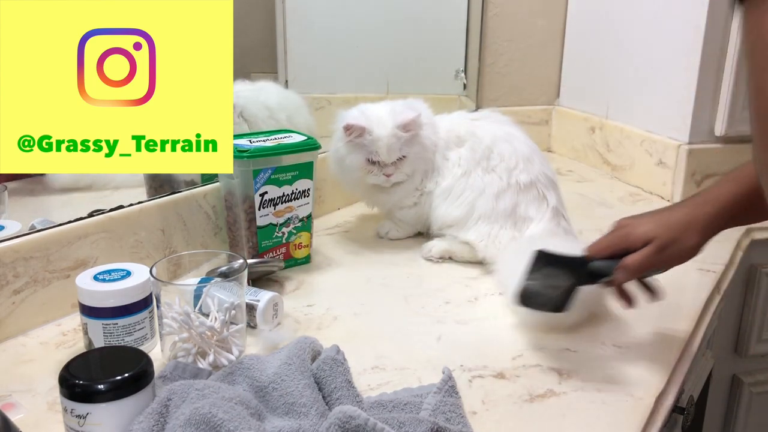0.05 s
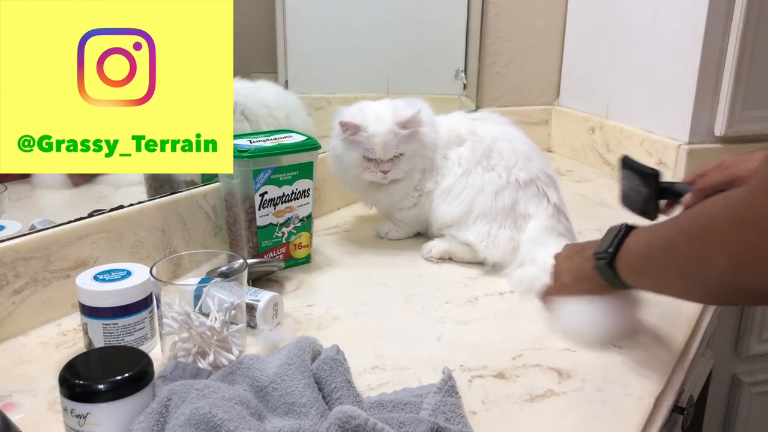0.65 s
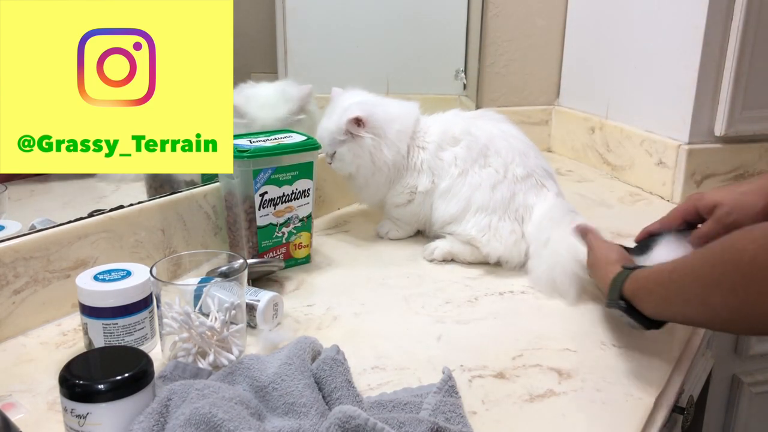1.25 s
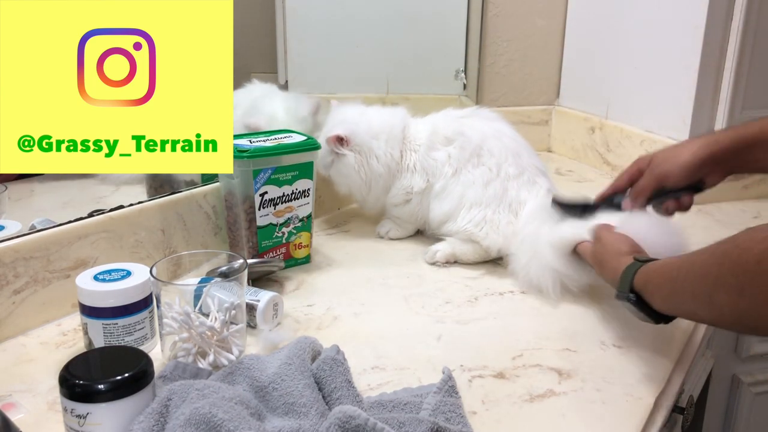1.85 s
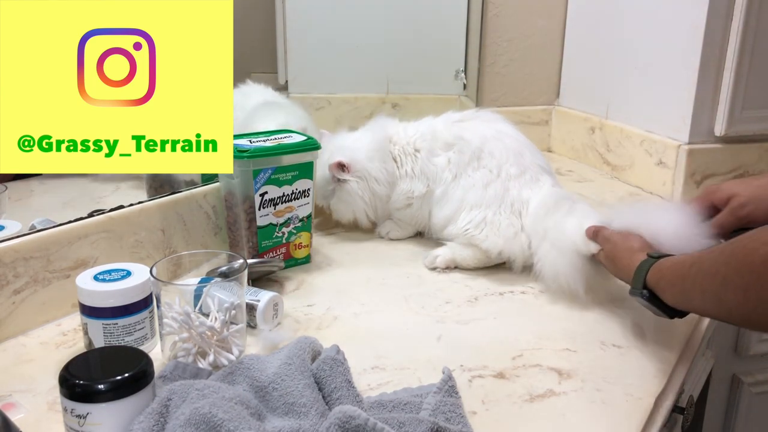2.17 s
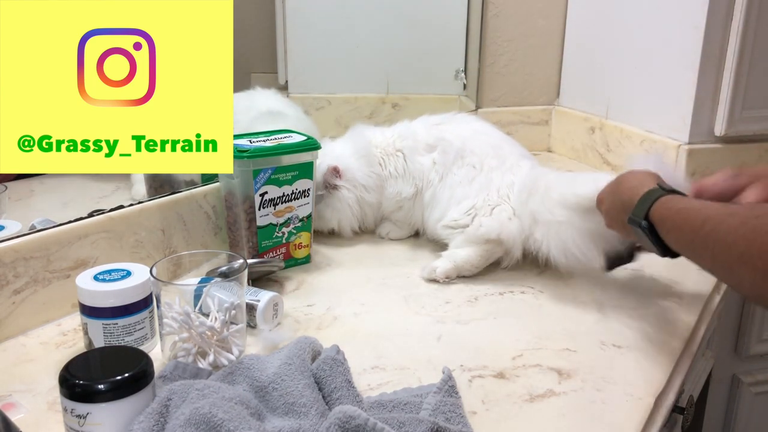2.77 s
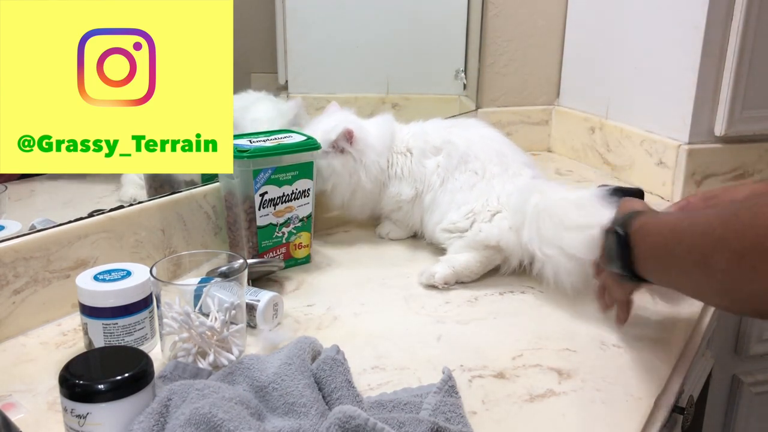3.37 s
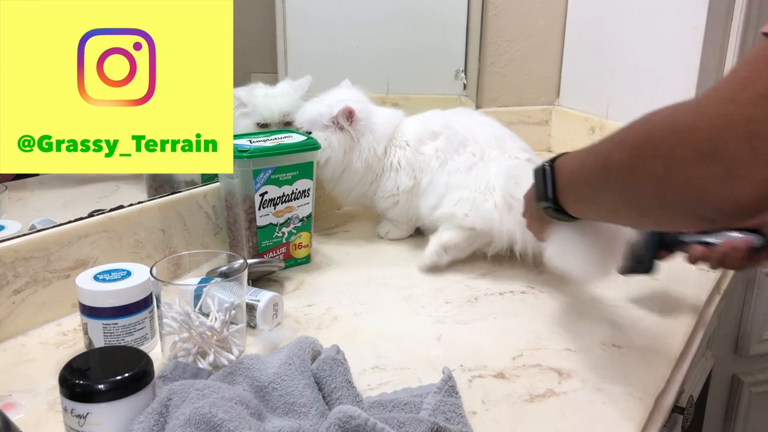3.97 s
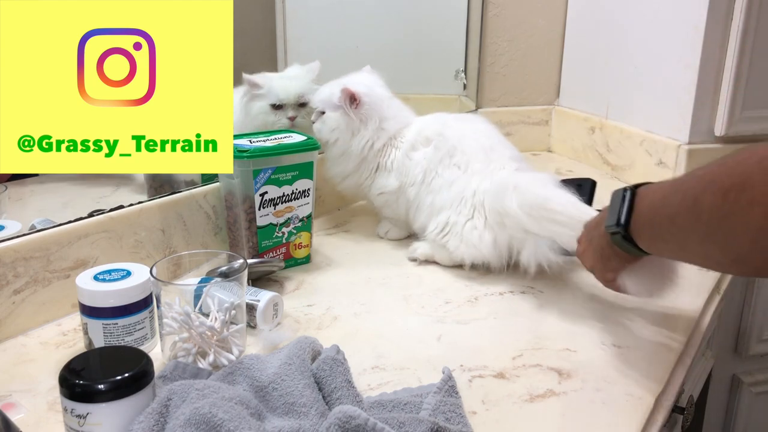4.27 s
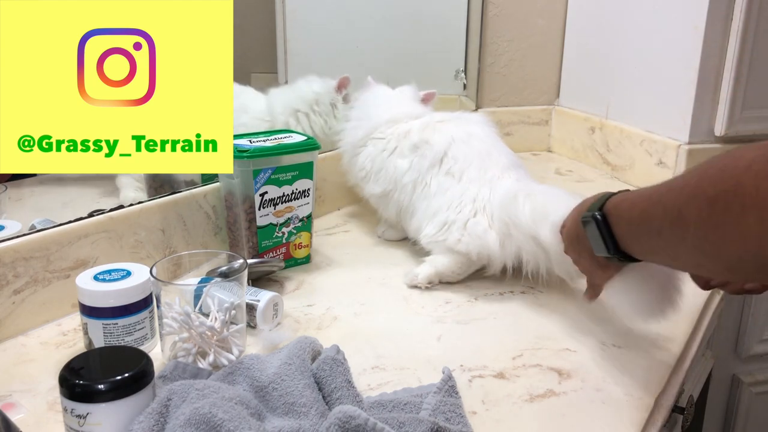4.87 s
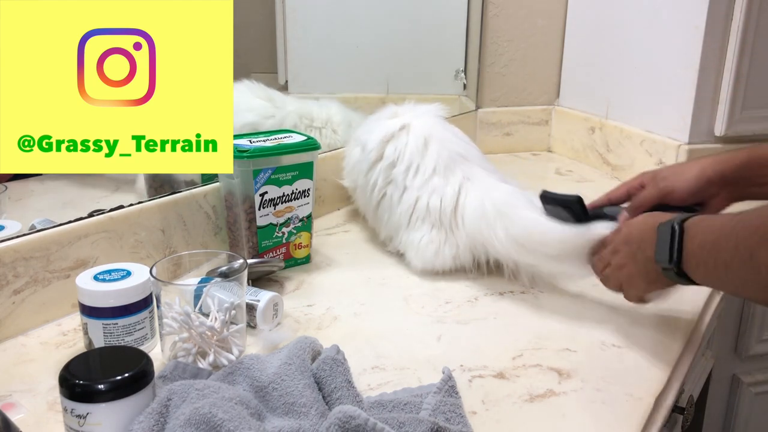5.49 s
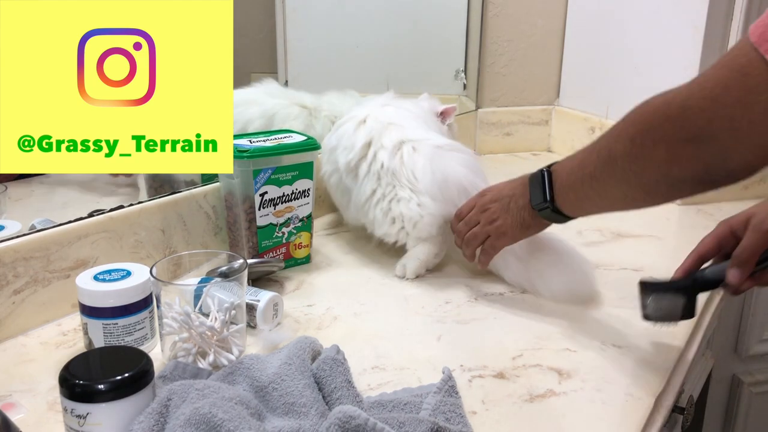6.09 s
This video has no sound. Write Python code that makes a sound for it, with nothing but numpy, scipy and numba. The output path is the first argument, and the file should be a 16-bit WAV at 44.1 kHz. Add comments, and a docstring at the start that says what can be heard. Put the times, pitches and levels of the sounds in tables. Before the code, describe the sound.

Wire bristles scratch softly through a long-haired cat's tail in uneven strokes. Early on, the tail swishes across a stone counter, followed by a few soft bumps and light taps. Tangles pluck free with small ticks as the brushing goes on. At the end the plastic brush knocks sharply on the counter and the cabinet below booms briefly. A faint hum fills the small bathroom.

```python
"""Brushing a cat in the bathroom

A long-haired cat is brushed on a stone counter. Wire bristles scratch through the tail and pluck at
tangles, the tail swishes over the stone, hand and brush tap lightly. At the end the plastic brush knocks
on the counter and the cabinet under it booms. A faint hum fills the small tiled room."""
import sys
import numpy as np
from scipy import signal
from scipy.fft import rfft, irfft
from scipy.io import wavfile
from scipy.ndimage import uniform_filter1d
from numba import njit

SR = 44100
rng = np.random.default_rng(int(sys.argv[2]) if len(sys.argv) > 2 else 0)


def wav_record(signal):
    """Record a signal, one row per channel, as 16-bit PCM in the file named by sys.argv[1]."""
    frames = np.transpose(np.atleast_2d(signal))
    bounded = np.clip(frames, -1, 1)
    # unit amplitude maps onto the largest positive 16-bit level
    quanta = np.round(bounded * 32767).astype(np.int16)
    wavfile.write(sys.argv[1], SR, quanta)


N = 270818
T = np.arange(N) / SR

# colour of the room's air: (frequency [Hz], level [dB])
AIR_COLOUR = [(15, -26), (25, -37), (43, -6.5), (79, -7.5), (110, -0.5), (152, -8), (209, -10), (331, -14),
              (399, -14.5), (1020, -24), (1410, -25.5), (1850, -29), (2300, -30.5), (9300, -30),
              (15500, -31.5)]
# mains hum: (pitch [Hz], level [dB], filter width [Hz])
MAINS_HUM = [(62, -71, 10.5), (115.5, -67.5, 9.9)]
# thin electrical whine: (pitch [Hz], level [dB])
WHINE_TONES = [(9227, -88), (9469, -79), (10670, -80.5)]
# brush strokes: (hardest pull [s], rise [s], fall [s], bristle scratch [dB], pull on tangles [dB],
# sliding hair [dB], tangle pitch [Hz], hiss pitch [Hz])
BRUSH_STROKES = [ (.07, .13, 0.064, -61.5, -66, -57.5, 990, 14000),
                 (.31, 0.25, 0.15, -66.5, -75, -71, 1090, 13200),
                 (.44, 0.089, .04, -58, -58.5, -61, 1250, 5530),
                 (1.035, .03, 0.037, -59, -58, -60, 760, 7760),
                 (1.45, 0.2, 0.2, -64, -63.5, -65.5, 1420, 5600),
                 (1.575, .09, 0.025, -54.5, -53, -59.5, 930, 5000),
                 (1.67, 0.058, 0.051, -66, -59.5, -61, 404, 8800),
                 (2.08, 0.13, 0.24, -59, -68.5, -66.5, 1560, 5500),
                 (2.45, 0.2, 0.094, -55, -60, -64, 1350, 12600),
                 (2.55, 0.11, 0.032, -52, -59.5, -56.5, 1050, 8700),
                 (2.755, 0.03, 0.034, -64.5, -85, -67, 1110, 12500),
                 (3.07, 0.083, 0.2, -65.5, -84, -70, 1070, 12900),
                 (3.29, 0.12, .11, -57.5, -58, -70, 1070, 13000),
                 (3.555, 0.16, 0.075, -60, -64, -68, 1070, 9500),
                 (3.791, 0.071, .045, -55.5, -56.5, -61, 700, 6000),
                 (4.49, 0.18, 0.17, -56.5, -57.5, -65.5, 1780, 13100),
                 (4.81, .19, 0.15, -58, -55.5, -66, 1260, 12600),
                 (4.92, 0.057, 0.031, -62.5, -53.5, -62.5, 1255, 12500),
                 (5.08, 0.19, 0.038, -55.5, -55, -62.5, 915, 13000),
                 (5.613, 0.048, 0.069, -48.5, -51.5, -63, 1240, 5500),
                 (5.72, .19, 0.26, -57.5, -64.5, -64, 1150, 12500),
                 (5.94, 0.068, 0.025, -57.5, -56.5, -62.5, 1010, 6000)]
# steady rustle under the hand that holds the tail: (scratch [dB], pull [dB], hair [dB])
HAND_RUSTLE = (-72.5, -81, -81)
# colour of the bristle scratch: (frequency [Hz], level [dB])
SCRATCH_COLOUR = [(200, -12), (450, 2.5), (900, -2.5), (1700, -2), (2600, -1), (3600, -1), (5700, -0.5),
                  (7300, -13), (10000, -26), (16000, -21)]
# resonances of the brush's hollow pad: (pitch [Hz], nominal width [Hz], level [dB])
PAD_MODES = [(440, 130, -13.5), (773, 79, 0), (1081, 122, 4), (1280, 130, -9), (1554, 34, -3.5)]
# colour of sliding hair: (frequency [Hz], level [dB])
HAIR_COLOUR = [(3000, -42), (6500, -8), (8800, -6.5), (11000, -9), (13000, -12.5), (16000, -13)]
# the tail's sweep over the counter: (time [s], level [dB], zip pitch [Hz])
TAIL_SWEEP = [(.46, -76, 9800), (.495, -56, 12600), (.53, -47.5, 14700), (.585, -48, 14300),
              (.625, -53.5, 11800), (.66, -61, 10200), (.76, -68, 8500)]
# colour of fur rubbing on stone: (frequency [Hz], level [dB])
RUB_COLOUR = [(120, -30), (260, -28), (420, 1.5), (600, -8.5), (900, -1), (1200, -6.5), (2500, -7.5),
              (3600, -10), (4300, -2), (5100, -5), (5600, -15), (6400, -4.5), (7400, -17.5), (15500, -13)]
# thin zings of hair: (start [s], fastest slide [s], end [s], top pitch [Hz], level [dB])
HAIR_ZINGS = [(.47, .535, .53, 14500, -61), (.60, .56, .72, 13200, -71), (.63, .62, .75, 9900, -72),
              (2.68, 2.775, 2.81, 13650, -69), (2.745, 2.775, 2.80, 8100, -69),
              (4.96, 5.02, 5.10, 13350, -69), (5.025, 5.055, 5.085, 14600, -67)]
# soft bumps on the counter: (time [s], level [dB], thud pitch [Hz], cabinet relative to level [dB])
SOFT_BUMPS = [(0.574, -40.5, 69.4, -15), (.937, -38, 257, -1.5), (0.959, -45, 66, -9),
              (1.071, -46.5, 318, 0), (1.157, -46.5, 334, -2), (5.221, -46.5, 68, -0.5)]
# modes of counter and cabinet: (pitch [Hz], level [dB], t60 [s])
CABINET_MODES = [(66, -15.5, 0.4), (116, -9, 0.44), (142.8, -3.5, 0.38), (170.6, -0.5, 0.36),
                 (216, -11.5, 0.47), (237, -1.5, 0.18), (266, -12, 0.33), (376, -22, 0.21)]
# taps of brush and hand: (time [s], level [dB], centre [Hz], nominal width [Hz], fade [s], pad knock [dB])
LIGHT_TAPS = [(.772, -45, 3180, 11000, 0.0088, -50), (.935, -49, 3200, 8000, 0.0049, -52),
              (1.070, -52, 1500, 5960, 0.0035, -56), (1.1565, -48.5, 1200, 5000, 0.0013, -60),
              (3.775, -49.5, 3060, 2980, 0.018, -48), (3.823, -43, 4700, 7500, 0.0082, -46.5),
              (4.1786, -35.5, 2220, 1600, 0.007, -54)]
# a bristle snaps free of a tangle: (time [s], level [dB], pitch [Hz])
TANGLE_SNAGS = [(2.442, -47.5, 2300), (3.402, -50.5, 1550), (3.433, -53.5, 2820), (3.458, -54, 3100),
                (3.519, -53.5, 1100), (4.514, -42.5, 1550), (4.801, -53, 1330), (4.813, -43.5, 1120),
                (4.867, -51, 1290), (4.911, -45, 1350), (4.928, -44.5, 1100)]
# the brush lands and chatters: (time [s], relative level [dB])
BRUSH_BOUNCES = [(5.9855, 1), (5.9872, 1), (5.9905, -2), (5.9942, -2), (5.9966, -12), (6.002, -22)]
# modes of the brush's body and handle: (pitch [Hz], level [dB], t60 [s])
BRUSH_MODES = [(705, -9, .12), (797, 1, .17), (895, -4, .16), (940, -11, .27), (1078, 2, .1),
               (1200, -5, .18), (1232, -11, .28), (1904, -2, .16), (2131, -7, .24), (2530, -7, .26),
               (2939, -9, .25), (3205, -7, .22), (3660, -4, .16), (3740, -4, .16), (3900, -5, .16),
               (4694, -12, .18), (5335, -14, .18), (7607, -15, .14)]
# colour of plastic cracking against stone: (frequency [Hz], level [dB])
CRACK_COLOUR = [(200, -48), (400, -20), (560, -6), (800, -3.5), (1100, 2.5), (1400, -10), (1850, -4),
                (2500, -7), (3700, -3.5), (5000, -10.5), (7200, -11.5), (8400, -16.5), (15500, -25)]
# the bathroom's reverb: (frequency [Hz], t60 [s])
ROOM_DECAY = [(100, 0.53), (500, 0.29), (1200, 0.28), (3000, 0.31), (6000, 0.25), (15000, 0.24)]

CABINET_LAG_S = 0.00416  # the cabinet answers this long after a blow


def undb(db):
    """Decibels to gain."""
    return 10 ** (np.asarray(db) / 20)


def unit(x):
    """Scale to rms 1."""
    return x / np.sqrt(np.mean(x ** 2))


def add(out, s, sound):
    """Mix a sound in at time s."""
    i = int(s * SR)
    out[i:i + len(sound)] += sound[:N - i]


def over_hz(points, hz):
    """Read a table on a log-frequency axis."""
    f, value = np.transpose(points)
    return np.interp(np.log(hz + 1), np.log(f), value)


def colour(x, points, size=8192):
    """Minimum-phase EQ of unit energy, drawn through (frequency [Hz], level [dB]) points."""
    gains = undb(over_hz(points, np.fft.rfftfreq(size, 1 / SR)))
    cepstrum = irfft(np.log(gains))
    cepstrum[1:size // 2] *= 2
    cepstrum[size // 2 + 1:] = 0
    response = irfft(np.exp(rfft(cepstrum)))
    return signal.fftconvolve(x, response / np.linalg.norm(response))[:len(x)]


def band(x, hz, width):
    """Two like band-passes in series, each width Hz wide; rms 1."""
    w = 2 * np.pi * hz / SR
    a = np.sin(w) * width / hz / 2
    biquad = [a, 0, -a], [1 + a, -2 * np.cos(w), 1 - a]
    return unit(signal.lfilter(*biquad, signal.lfilter(*biquad, x)))


@njit
def swept_resonance(x, hz, share):
    """A band-pass whose centre moves; its width is a share of the centre."""
    y, band_state, low_state = np.empty(len(x)), 0., 0.
    for i in range(len(x)):
        g = np.tan(np.pi * min(hz[i] / SR, .45))
        v = (band_state + g * (x[i] - low_state)) / (1 + g * (g + share))
        band_state = 2 * v - band_state
        low_state += 2 * g * v
        y[i] = share * v
    return y


def swept_band(x, hz, share):
    """Two swept resonances in series; rms 1."""
    return unit(swept_resonance(swept_resonance(x, hz, share), hz, share))


def walk(rate):
    """Smooth random drift that turns about rate times a second."""
    k = int(SR / rate)
    steps = np.repeat(rng.standard_normal(N // k + 1), k)
    return unit(uniform_filter1d(steps, k)[:N])


def ring(modes, t):
    """Free decay of an object's modes."""
    return sum(undb(db - 60 * t / t60) * np.sin(2 * np.pi * hz * t) for hz, db, t60 in modes)


def room_tone(air_db=-59, wander_hz=45):
    """A bed of soft air, wavering mains hum and thin electrical whine."""
    air = colour(rng.standard_normal(N), AIR_COLOUR) * undb(air_db + .5 * walk(2.2))
    hum = sum(undb(db) * band(rng.standard_normal(N), hz, width) for hz, db, width in MAINS_HUM)
    whine = np.zeros(N)
    for hz, db in WHINE_TONES:
        pitch = hz + wander_hz * walk(400)
        whine += undb(db) * unit(np.sin(2 * np.pi * np.cumsum(pitch) / SR))
    return air + hum + whine


def slips(rate, spread_db):
    """Dense tiny releases of hair, rate a second, uneven in size."""
    happens = rng.random(N) < rate / SR
    size = undb(spread_db * np.minimum(rng.exponential(size=N), 5))
    return unit(happens * size * rng.choice([-1, 1], N))


def strokes(swell_db=11.5, roundness=1.24, sag_octaves_per_s=1.34):
    """Each stroke swells and lets go: gains of scratch, pull and hair, pitches of tangle and hiss."""
    t = T[::64]
    s, rise, fall, scratch, pull, hair, tangle_hz, hiss_hz = np.transpose(BRUSH_STROKES)[:, :, None]
    pressure_db = -swell_db * np.maximum((s - t) / rise, (t - s) / fall) ** roundness
    powers = [undb(db + pressure_db) ** 2 for db in (scratch, pull, hair)]
    gains = [np.sqrt(power.sum(axis=0) + undb(db) ** 2) for power, db in zip(powers, HAND_RUSTLE)]
    sag = 2 ** np.clip(sag_octaves_per_s * (s - t), -1, 1)  # a tangle rasps lower as it is drawn out
    _, pull_power, hair_power = powers  # the loudest stroke leads the pitch
    tangle_pitch = np.average(tangle_hz * sag, axis=0, weights=pull_power)
    hiss_pitch = np.sum(hiss_hz * hair_power, axis=0) / hair_power.sum(axis=0)
    return [np.interp(T, t, control) for control in (*gains, tangle_pitch, hiss_pitch)]


def brushing():
    """Bristles scratch, tangles rasp and pluck the hollow pad, and sliding hair hisses on top."""
    scratching, pulling, sliding, tangle_hz, hiss_hz = strokes()
    catch = undb(0.9 * walk(70))  # the brush catches and lets go
    scratch = colour(slips(rate=7000, spread_db=-1.5), SCRATCH_COLOUR) * scratching
    tugs = slips(rate=2500, spread_db=4.5)
    pad = unit(sum(undb(db) * band(tugs, hz, 1.34 * width) for hz, width, db in PAD_MODES))
    rasp = swept_band(slips(rate=900, spread_db=2.5), tangle_hz, share=0.52)
    pull = (undb(-6) * pad + undb(-3) * rasp) * pulling
    hiss = swept_band(slips(rate=13000, spread_db=2.5), hiss_hz, share=0.52)
    sheen = colour(slips(rate=15000, spread_db=3), HAIR_COLOUR)
    hair = (undb(-1) * sheen + undb(-4) * hiss) * sliding
    return (scratch + pull) * catch + hair


def tail_swish():
    """Thousands of hair tips slide over the stone; their zip rises and falls with the speed."""
    times, db, hz = np.transpose(TAIL_SWEEP)
    sweeping = (T > times[0]) & (T < times[-1])
    rub = colour(slips(rate=15000, spread_db=-1.5), RUB_COLOUR)
    zipping = swept_band(rng.standard_normal(N), np.interp(T, times, hz), share=0.64)
    return (rub + undb(-4) * zipping) * undb(np.interp(T, times, db)) * sweeping


def zings(bend=0.24, waver=0.009):
    """Hair rubbed along its scales sings; the pitch follows the sliding speed."""
    out, unsteady = np.zeros(N), walk(1500)
    for start, fastest, end, hz, db in HAIR_ZINGS:
        span = slice(int(start * SR), int(end * SR))
        slowing = (1 + ((T[span] - fastest) / 0.058) ** 2) ** bend
        speed = (1 + waver * unsteady[span]) / slowing
        swell = signal.windows.tukey(len(speed), .8)
        add(out, start, undb(db) * swell * np.sin(2 * np.pi * np.cumsum(hz * speed) / SR))
    return out * np.sqrt(2)


def boom(bright_hz, rise_s):
    """The cabinet swells and rings after a blow; a softer blow reaches only its low modes."""
    t = T[:SR // 2]
    modes = [(hz, db - 10 * np.log10(1 + (hz / bright_hz) ** 6), t60) for hz, db, t60 in CABINET_MODES]
    sound = ring(modes, t) * (1 - np.exp(-(t / rise_s) ** 2))
    return sound / np.max(np.abs(sound))


def bumps(thud_cycles=2.5):
    """A hand or paw lands with a hollow thud and a soft pat; the cabinet answers a moment later."""
    out, t = np.zeros(N), T[:SR // 2]
    for s, db, hz, cabinet_db in SOFT_BUMPS:
        thud = np.sin(2 * np.pi * hz * t) * (1 - np.exp(-t * hz)) * np.exp(-t * hz / thud_cycles)
        pat = band(rng.standard_normal(len(t)), 1.24 * hz, width=hz) * np.exp(-t / 0.031)
        add(out, s, undb(db) * (undb(1) * thud + undb(-9) * pat))
        add(out, s + CABINET_LAG_S, undb(db + cabinet_db) * boom(hz, rise_s=0.0022))
    return out


def rattle(fade_s):
    """A white click scattered over a few milliseconds."""
    t = T[:SR // 2]
    envelope = np.exp(-t / fade_s)
    phase = np.angle(rfft(rng.standard_normal(len(t)) * envelope))
    click = irfft(np.exp(1j * phase), len(t)) * envelope ** .25
    return click * np.linalg.norm(envelope) / np.linalg.norm(click)


def tick(db, hz, width, fade_s):
    """A brief contact rattles the brush around one pitch and dies away at once."""
    click = rattle(fade_s)
    return undb(db) * np.std(click) * band(click, hz, 2 * width)


def taps():
    """Light taps rattle the bristles and knock the hollow pad; once a wire bristle pings."""
    out = np.zeros(N)
    for s, db, hz, width, fade_s, pad_db in LIGHT_TAPS:
        bristles = tick(db, hz, width, fade_s)
        pad = tick(pad_db, hz=695, width=370, fade_s=0.01)
        add(out, s, bristles + pad)
    ping = tick(db=-42, hz=13500, width=1400, fade_s=0.004)
    add(out, 4.1785, ping)
    return out


def snags():
    """Tangles snap free of the bristles, each with a short pluck."""
    out = np.zeros(N)
    for s, db, hz in TANGLE_SNAGS:
        add(out, s, tick(db, hz, width=0.41 * hz, fade_s=0.0058))
    return out


def brush_knock():
    """The brush hits the stone with a chattering crack, and its plastic body rings on."""
    contacts, body, t = np.zeros(N), np.zeros(N), T[:SR // 2]
    for s, db in BRUSH_BOUNCES:
        add(contacts, s, undb(db) * rattle(fade_s=0.0017))
    add(body, BRUSH_BOUNCES[0][0], ring(BRUSH_MODES, t) * (1 - np.exp(-t / 0.0007)))
    return undb(-15.5) * colour(contacts, CRACK_COLOUR), undb(-33) * body


def cabinet():
    """The knock travels through the counter and sets the cabinet booming."""
    out = np.zeros(N)
    add(out, BRUSH_BOUNCES[0][0] + CABINET_LAG_S, undb(-21) * boom(bright_hz=302, rise_s=0.0045))
    return out


def bathroom(send, onset_s=0.00087):
    """Dense reflections from mirror and tiles, duller as they fade."""
    t = T[:SR // 2]
    hz, s, cells = signal.stft(rng.standard_normal(len(t)), SR, nperseg=256)
    fading = undb(-60 * s / over_hz(ROOM_DECAY, hz)[:, None])
    echoes = signal.istft(cells * fading, SR)[1][:len(t)]
    echoes *= 1 - np.exp(-(t / onset_s) ** 2)
    softened = signal.lfilter(*signal.butter(1, 8000, fs=SR), send)
    return signal.fftconvolve(softened, echoes / np.linalg.norm(echoes))[:N]


def scene(fur_send_db=-7, hit_send_db=-3):
    """Fur and sharp hits feed the reverb, over dry lows and room tone; the same in both ears."""
    fur = brushing() + tail_swish() + zings()
    crack, ringing = brush_knock()
    hits = taps() + snags() + crack
    reverb = bathroom(undb(fur_send_db) * fur + undb(hit_send_db) * hits)
    mono = fur + hits + ringing + reverb + bumps() + cabinet() + room_tone()
    return np.array([mono, mono])


def record(dry, top_hz=15850):
    """A phone's steep low-pass cuts the very top."""
    return signal.sosfilt(signal.ellip(10, .2, 70, top_hz, fs=SR, output="sos"), dry)


dry = scene()
out = record(dry)
wav_record(out)
```